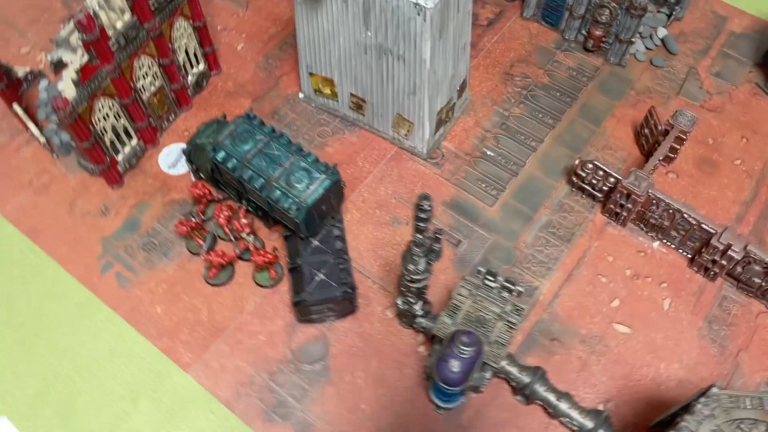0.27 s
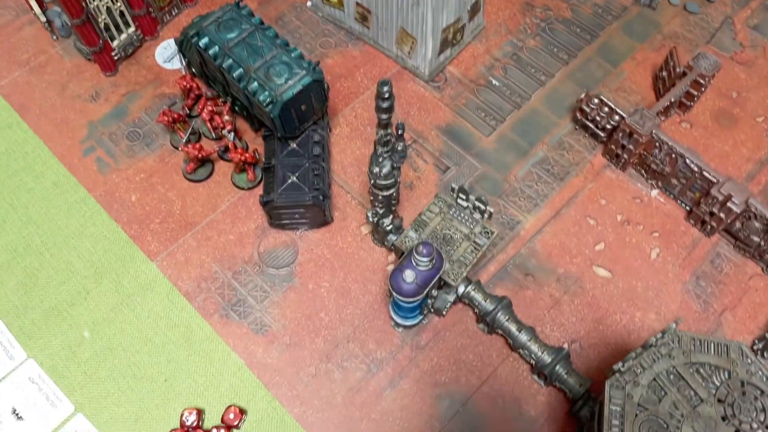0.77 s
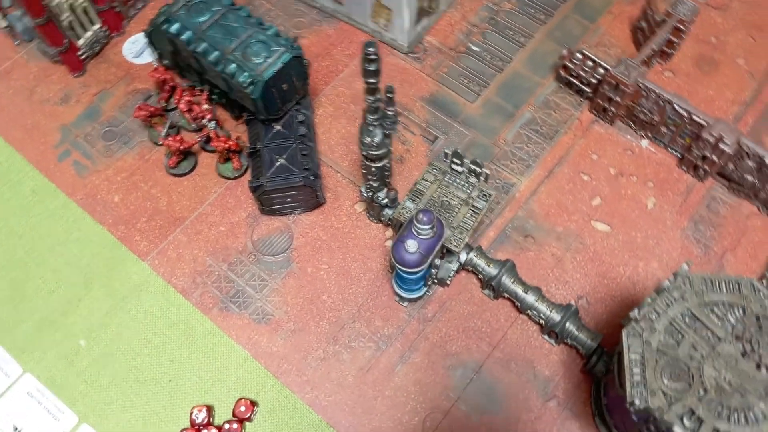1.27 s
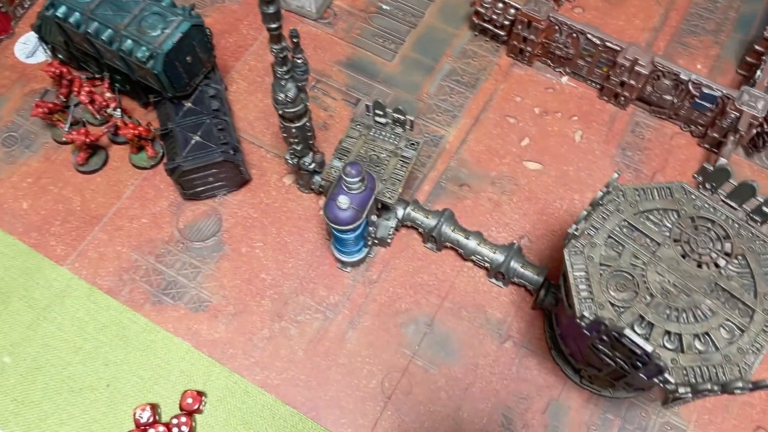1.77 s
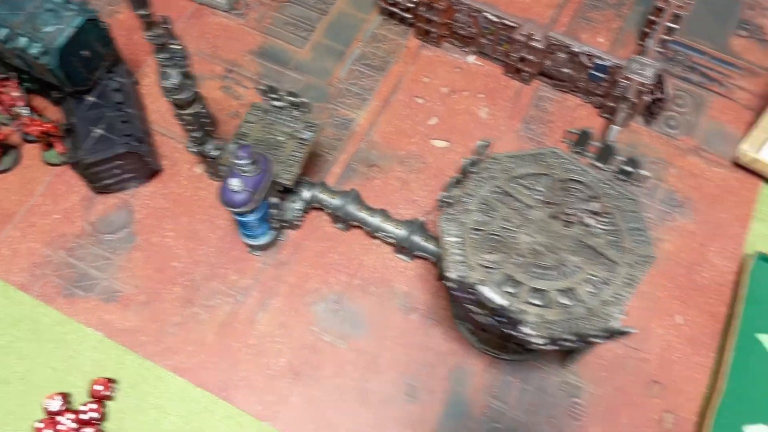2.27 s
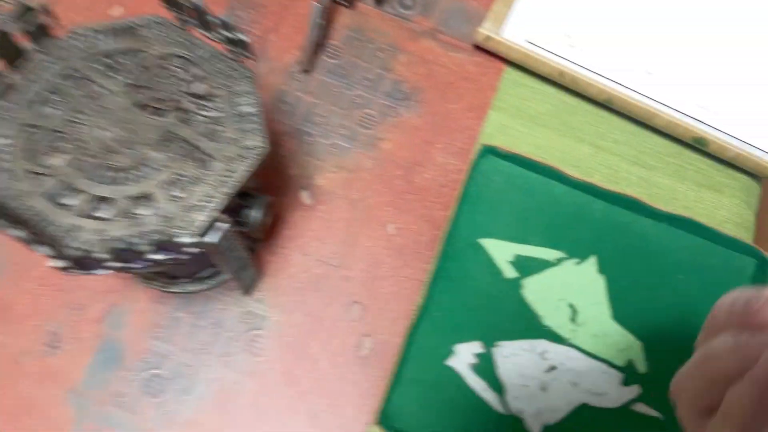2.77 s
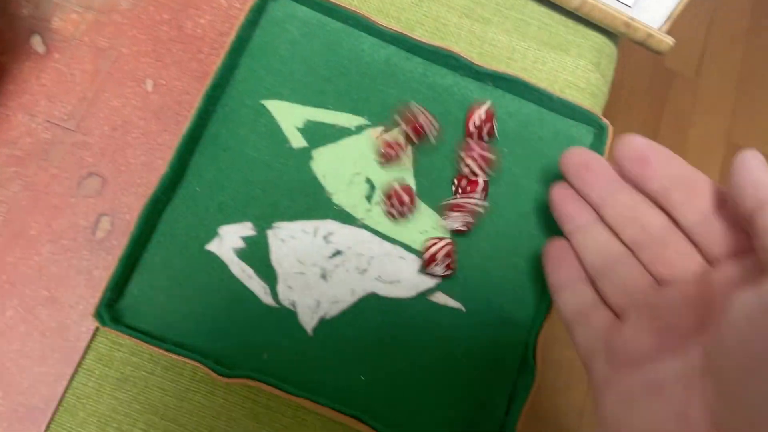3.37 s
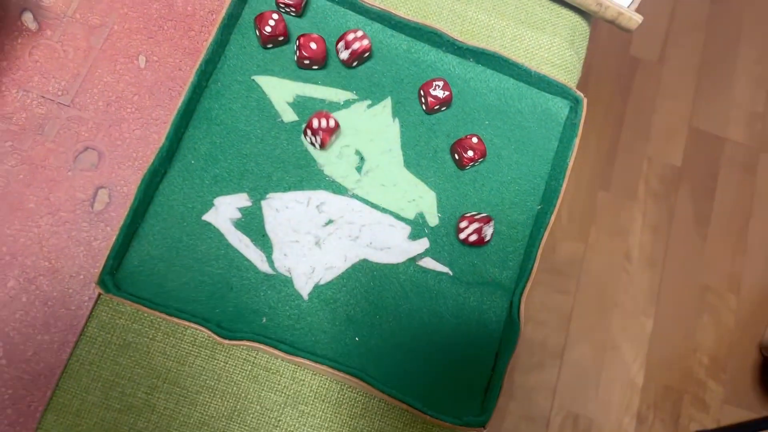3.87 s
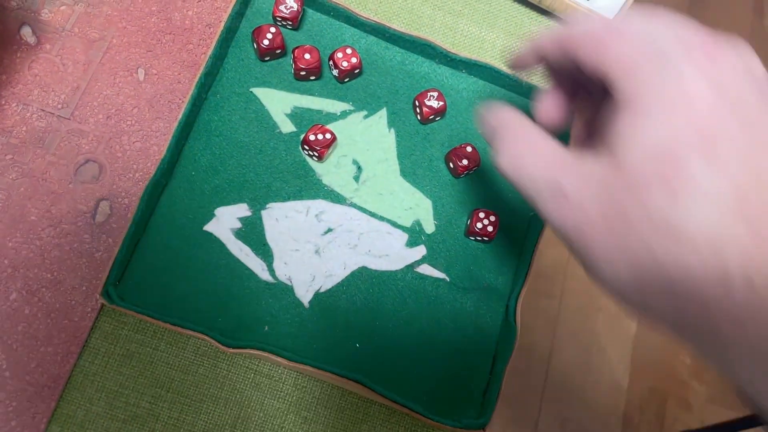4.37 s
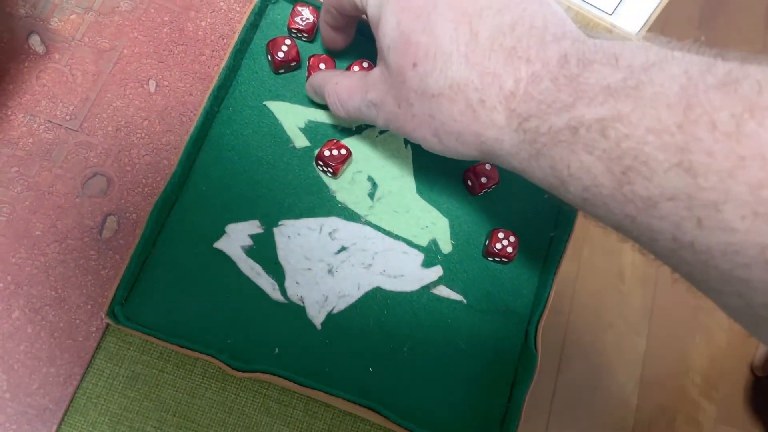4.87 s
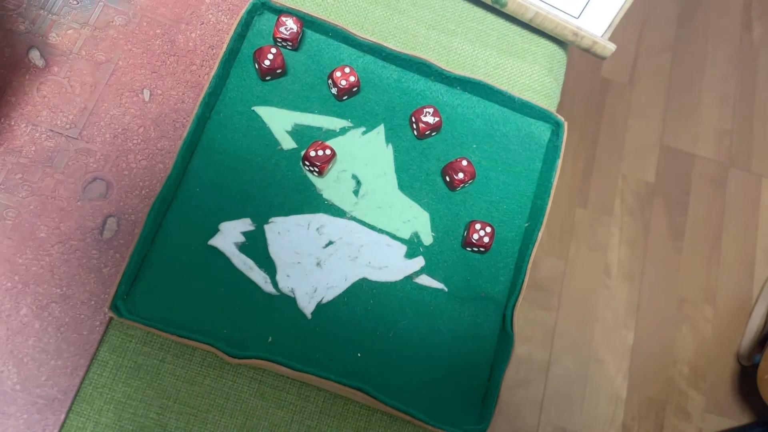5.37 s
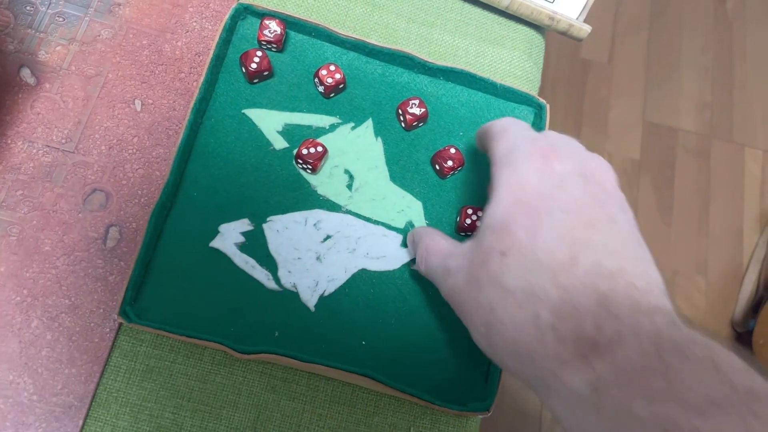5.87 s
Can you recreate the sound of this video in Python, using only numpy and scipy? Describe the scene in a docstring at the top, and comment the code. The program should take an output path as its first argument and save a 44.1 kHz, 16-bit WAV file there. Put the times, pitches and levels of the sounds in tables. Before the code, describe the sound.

A small, quiet room heard by two close microphones, with faint low room air throughout. From about 0.2 to 1.7 seconds a hand sweeps dice across a table: gritty, uneven scraping, a light tap at 0.3, a cluster of dull bumps from 0.5, the strongest near 0.7, and more around 1.2. Small bright ticks begin at 1.3 and gather near 1.65. From 2.1 to 2.85 the dice rattle in the palm in rapid, hard, crisp clicks. After a brief gap, clicks resume at 3.1 and the throw peaks at 3.2 to 3.4, with a very sharp crack at 3.34 and low, felt-muffled thuds ringing the tabletop; last ticks fall by 3.7. Then near quiet: a soft brush and dull hollow knock around 4.1, a loud tight run of hollow knocks with a short buzz at 4.6, a low bump at 5.4, faint brushing, and a final muted knock at 6.1.

```python
"""Dice are gathered from a gaming table, shaken in one hand and thrown into a felt-lined tray, in a small room.
Close to two microphones they click as short coloured ticks, and thud through the felt as ringing table modes.
The hand bumps the table as it sweeps them up (filtered noise and slips); skin and sleeve brush over cloth.
A few hollow knocks follow as dice are picked out: rough contacts shake a hollow body, which buzzes after
the loudest. Light taps and the air of the room, as shaped noise, complete the scene."""
import sys
import numpy as np
from scipy import signal
from scipy.fft import rfft, irfft
from scipy.io import wavfile
from scipy.ndimage import map_coordinates

SR = 44100
rng = np.random.default_rng(int(sys.argv[2]) if len(sys.argv) > 2 else 0)


def put_to_file(sound):
    """Save the sound as 16-bit audio at rate SR, in the file named by the first command-line argument."""
    columns = np.atleast_2d(sound).T  # one column per channel
    safe = np.clip(columns, -1, 1)
    whole_steps = np.round(safe * 32767)
    wavfile.write(sys.argv[1], SR, whole_steps.astype(np.int16))


N = 270156
TIME = np.arange(N) / SR

# spectrum of die on die: f/Hz, relative level/dB
DIE_SPECTRUM = [(900, -8), (1600, 4), (2900, -0.5), (4300, 2), (5500, 0), (7500, 1.5), (9500, -0.5),
                (10800, -6), (13200, -6.5), (15000, -34)]
# dice tumbling over each other, in the palm or falling:
# t/s, length/s, relative level of grinding/dB, relative level of loose clicks/dB
TUMBLES = [(2.15, 0.03, -52, -45.5), (2.213, 0.058, -31, -31.5), (2.287, 0.072, -47, -31),
           (2.42, 0.052, -78, -33.5), (2.551, 0.1, -63, -32), (3.183, 0.088, -70, -51),
           (3.342, 0.016, -26.5, -31)]
# hollow knocks: t/s, relative level/dB, hardness of the contact as upper band edge f/Hz, loss per rebound/dB
HOLLOW_KNOCKS = [(4.1222, -10.5, 2300, 6.5), (4.585, -2, 4200, 8), (4.601, -5, 4500, 6.5),
                 (4.634, -9, 4000, 10.5), (6.104, -10, 1900, 9)]
HOLLOW_T60_S = 0.048
OPPOSED_HZ = 8690  # where the two microphones move in opposite phase


def dice_clicks(level_db, near_db, near_s, tilt_db, size=1024):
    """Hard cubes meet in a fraction of a millisecond; palm and tray scatter each differently coloured tick."""
    # clicks that stand out: t/s, relative level/dB, brightness f/Hz
    clear_clicks = [(1.3086, -26.5, 6060), (1.333, -29.5, 4560), (1.4058, -31.5, 6660),
                    (1.506, -37.5, 6950), (1.543, -36, 4800), (1.638, -30.5, 7000), (1.6445, -22.5, 7900),
                    (1.6787, -17.5, 5670), (2.091, -45, 3650), (2.136, -44, 4360), (2.1989, -31.5, 4900),
                    (2.21, -26.5, 6350), (2.223, -17, 9390), (2.2261, -12, 8480), (2.25, -21.5, 5130),
                    (2.2575, -32, 5200), (2.2645, -21, 6200), (2.309, -33.5, 5340), (2.339, -23, 5400),
                    (2.4132, -25, 4900), (2.4298, -25.5, 5140), (2.458, -37, 4740), (2.483, -19, 6600),
                    (2.4881, -25, 4500), (2.503, -25, 6000), (2.5397, -26.5, 4933), (2.5489, -16, 5250),
                    (2.5626, -30, 5000), (2.569, -25, 5200), (2.5794, -21.5, 5200), (2.592, -40, 5560),
                    (2.607, -21, 5500), (2.6181, -25, 5800), (2.6199, -20, 5130), (2.642, -20, 5700),
                    (2.6537, -21, 4890), (2.6613, -28, 4680), (2.6899, -22, 6460), (2.7607, -39.5, 5020),
                    (2.7963, -27.5, 4350), (2.803, -21, 2800), (2.8304, -37.5, 6000), (2.8337, -23.5, 5870),
                    (3.095, -37.5, 5520), (3.1689, -33, 4357), (3.1773, -28, 4800), (3.183, -30.5, 4200),
                    (3.1877, -30.5, 4223), (3.1997, -23.5, 4715), (3.1993, -25.5, 4375),
                    (3.2045, -27, 5044), (3.206, -12.5, 5184), (3.2106, -17.5, 5810), (3.2143, -32, 6200),
                    (3.221, -21.5, 5890), (3.2255, -24.5, 4314), (3.2318, -19.5, 6570), (3.2444, -15, 4983),
                    (3.258, -28, 5240), (3.318, -22, 5340), (3.333, -17.5, 6000), (3.344, -20, 6280),
                    (3.3434, -0.5, 8350), (3.3663, -18, 6960), (3.3866, -18, 5046), (3.3942, -10.5, 8140),
                    (3.5314, -20, 6460), (3.5632, -29, 2180), (3.5965, -26, 5880), (3.6632, -26, 6320),
                    (3.678, -32, 5970), (3.685, -18, 7140)]
    ring_db, ring_octaves = 10.5, 0.63  # each contact rings around its own brightness
    out = np.zeros((2, N))
    hz = np.geomspace(900, 16000, 48)
    for s, db, bright_hz in clear_clicks + loose_clicks():
        tilt = tilt_db * np.log2(bright_hz / 5800) * np.log2(np.maximum(hz, 2500) / 5800)
        ripple_db = rng.normal(0, 2.2, len(hz))
        ringing = ring_db * np.exp(-(np.log2(hz / bright_hz) / ring_octaves) ** 2)
        spectrum = np.c_[hz, at_hz(DIE_SPECTRUM, hz) + tilt + ripple_db + ringing]
        tick = band(colour(spectrum, size=size), 600, 19000)
        tick = np.roll(tick, 8)  # a few samples of room ahead of the tick
        scattered = through(splash(near_s, size=size), tick)
        add(out, s, from_db(db + level_db) * unit(off_axis(tick) + from_db(near_db) * scattered))
    return out


def loose_clicks(count=16):
    """While the dice tumble they collide at a rough, uneven rate: rows of t/s, relative level/dB, f/Hz."""
    clicks_per_s, spread_db = 170, 1
    bright_hz, spread_octaves = 5240, 0.073
    rows = []
    for start, length, _, db in TUMBLES:
        lateness = rng.random(count)
        strengths, tones = rng.standard_normal((2, count))
        for k in range(count):
            after = (k + lateness[k]) / clicks_per_s
            if after < length:
                brightness = bright_hz * 2 ** (spread_octaves * tones[k])
                rows.append((start + after, db + spread_db * strengths[k], brightness))
    return rows


def dice_rattle():
    """Tumbling dice grind, as slips coloured like a die, and jostle edge on edge."""
    grind_db, jostle_db = -2, -10
    grinding = band(friction(DIE_SPECTRUM, grains_per_s=700, grain_share=.5), 2600, 13000, order=2)
    motion = strokes(TUMBLES, attack_s=0.0045, release_db_per_s=280.5)
    return motion * (from_db(grind_db) * grinding + from_db(jostle_db) * jostle())


def jostle(count=12):
    """Dice edges graze each other: small, uneven ticks, each ringing a few cycles at its pitch; rms one."""
    out = np.zeros(N)
    for hz in np.geomspace(3800, 9500, count):
        touches = (rng.random(N) < 45 / SR) * rng.choice([-1, 1], N)  # 45 a second
        touches = touches * from_db(rng.uniform(-14, 0, N))
        out += band(touches + 1e-18, hz / 1.2, hz * 1.2, order=2) / hz
    return np.sqrt(N) * unit(off_axis(out))


def tray_landings():
    """Dice thud through the felt into the table top and clack on the felt-damped floor of the tray."""
    # dice landing: t/s, relative level of thud/dB, relative level of clack/dB
    landings = [(3.308, -4, 0.5), (3.318, -3.5, -13), (3.329, -6, -8), (3.351, -28, -0.5),
                (3.358, -3, -14.5), (3.3845, -7.5, 6.5), (3.394, -13, 0.5), (3.422, -11.5, -24),
                (3.454, -35, -31), (3.483, -14.5, -4.5), (3.512, -14.5, -26), (3.563, -6.5, -1.5)]
    # modes of the tray floor: f/Hz, relative level/dB, t60/s
    tray_floor = [(890, -3, 0.0075), (1180, -6.5, 0.02), (1320, 5, 0.0099), (2200, 3, 0.0057)]
    return table_blows(landings, "tray", tray_floor, wave_db=5, thud_db=-29.0, clack_db=-23.5,
                       travel_s=0.0069, grit_db=-9.5, grit_s=0.0013, low_hz=600, soft_hz=1750,
                       thud_wet_db=-2.5, clack_wet_db=-6.5, order=4)


def table_bumps():
    """Hand and dice bump the middle of the table, whose skin clacks briefly."""
    # bumps: t/s, relative level of thud/dB, relative level of clack/dB
    bumps = [(0.509, -14, -7.5), (0.528, -20.5, -12), (0.549, -17.5, -8.5), (0.574, -11, -32),
             (0.715, 0, 1), (0.738, -3.5, -14), (0.868, -21.5, -40), (0.968, -23.5, -29.5),
             (1.175, -8.5, -21), (1.224, -11.5, -17.5), (1.59, -22, -38), (1.625, -25.5, -38),
             (1.69, -24.5, -34), (1.775, -23.5, -40.5), (5.400, -8.5, -32.5)]
    # modes of the table's skin: f/Hz, relative level/dB, t60/s
    table_skin = [(706, -18, 0.0045), (905, -15, 0.057), (1000, -29, 0.062), (1090, 17, 0.0053),
                  (1200, -17.5, 0.0066), (1640, -32, 0.055), (2260, 23, 0.0041)]
    return table_blows(bumps, "middle", table_skin, wave_db=2, thud_db=-31.0, clack_db=-30.5,
                       travel_s=0.00967, grit_db=11.5, grit_s=0.013, low_hz=670, soft_hz=1680,
                       thud_wet_db=-5, clack_wet_db=-1.0, order=3)


def table_blows(rows, place, skin, wave_db, thud_db, clack_db, travel_s, grit_db, grit_s,
                low_hz, soft_hz, thud_wet_db, clack_wet_db, order):
    """A wave crosses the table top, whose modes boom by place struck; cloth cuts the clack above soft_hz."""
    # table top: f/Hz, relative level struck through the tray/dB, relative level bumped in the middle/dB
    table_modes = [(61.6, 5, 6), (79, 0, -14), (116.3, -12, 4), (141, 7.5, 8), (168, 7, -2),
                   (189, 2.5, -3.5), (225.4, -3.5, -8), (270.8, -6.5, 0), (319.6, -2, -14), (346.3, -9, -2),
                   (429, -15, -8), (522, -24.5, -16), (600.7, -19, -21)]
    t60_s = 0.17
    modes = [(hz, tray_db if place == "tray" else middle_db, t60_s) for hz, tray_db, middle_db in table_modes]
    thuds, clacks = np.zeros((2, 2, N))
    for s, thud, clack in rows:
        add(thuds, s, from_db(thud + wave_db) * bending_wave(travel_s))
        # the modes start later than the first wave
        boom = from_db(thud_db) * ring(modes, scatter_db=3.0, travel_s=travel_s * 2)
        add(thuds, s, from_db(thud) * band(boom, 48, 800, order=3))
        knock = from_db(clack_db) * ring(skin, scatter_db=2.0, travel_s=0, size=4096)
        knock = knock + from_db(grit_db) * splash(grit_s, size=4096)
        add(clacks, s, from_db(clack) * band(knock, low_hz, soft_hz, order=order))
    return room(thuds, thud_wet_db, build_s=.002) + room(clacks, clack_wet_db, build_s=.004)


def bending_wave(travel_s, size=4096):
    """High pitches outrun low ones through the table top, so the thud sweeps down (travel_s at 100 Hz)."""
    # spectrum of the first wave: f/Hz, relative level/dB
    wave_spectrum = [(25, -40), (60, -3), (130, 4), (330, -1), (650, -12.5), (1000, -27.5), (1500, -37.5),
                     (4000, -47.5)]
    hz = np.fft.rfftfreq(size, 1 / SR)
    lag = np.exp(-2j * np.pi * travel_s * 20 * np.sqrt(hz))
    return irfft(rfft(colour(wave_spectrum, size=size)) * lag)


def knocks(ring_db, crack_db, crack_s, count=4):
    """A rough contact cracks and shakes a hollow body, dulled by its softness; rebounds grow weaker."""
    # spectrum of the crack: f/Hz, relative level/dB
    crack_spectrum = [(30, -16), (55, 17), (90, 19), (150, 6.5), (240, 12), (400, 18), (800, 3.5),
                      (2200, 10), (2700, 19), (3700, 0), (5500, -13), (8000, -3), (13000, -2),
                      (15000, -9.5)]
    rebound_s = 0.019
    out = np.zeros((2, N))
    for s, db, hard_hz, loss_db in HOLLOW_KNOCKS:
        for k in range(count):
            contact = off_axis(splash(crack_s, size=8192)[0])
            body = ring(hollow_modes(HOLLOW_T60_S), scatter_db=3.0, travel_s=0.00093, size=4096)
            response = from_db(ring_db) * body + from_db(crack_db) * colour(crack_spectrum)
            knock = band(through(contact, response), 62, hard_hz, order=2)
            add(out, s + k * rebound_s, from_db(db - k * loss_db) * knock)
    return out


def hollow_modes(t60):
    """The hollow body is gripped differently at each contact, which shifts every mode a little."""
    # modes before the shift: f/Hz, relative level/dB
    hollow_body = [(76, -3), (160, -2), (350, -5), (425, -24.5), (485, -4.5), (600, -2.5), (955, -3),
                   (1127, -3.5), (1330, -20.5), (1740, -1.5), (2070, 1), (2200, -11.5), (3120, -9),
                   (3620, -0.5), (5310, -6), (5750, -16.5)]
    detune_octaves = 0.032
    return [(hz * 2 ** (detune_octaves * rng.uniform(-1, 1)), db, t60) for hz, db in hollow_body]


def shiver(ring_db, count=5):
    """After the loudest knock the hollow body buzzes on in its upper modes, which shift as it settles."""
    # spectrum of the buzz: f/Hz, relative level/dB
    buzz_spectrum = [(200, -3.5), (500, 8), (1200, 3.5), (2200, 4), (2800, -5), (3700, -1), (4600, -5.5),
                     (5600, -1), (6400, -6.5), (7800, 2), (9000, -6), (13500, -5), (15500, -26.5)]
    level_db, length_s = -34.5, 0.087
    start = max(HOLLOW_KNOCKS, key=lambda row: row[1])[0]
    buzz = friction(buzz_spectrum, grains_per_s=410, grain_share=0.25)
    ringing = 0
    for share in np.eye(count):  # crossfade from one set of modes to the next
        modes = [mode for mode in hollow_modes(HOLLOW_T60_S / 2) if mode[0] > 2100]
        turn = np.interp(TIME, start + np.linspace(0, length_s, count), share)
        body = unit(ring(modes, scatter_db=6.0, travel_s=0, size=2048))
        ringing = ringing + np.sqrt(turn) * through(buzz, body)
    motion = strokes([(start, length_s, level_db)], attack_s=0.018, release_db_per_s=270)
    return motion * (buzz + from_db(ring_db) * ringing)


def taps(level_db):
    """Small pieces touch down lightly: short bursts of noise in one band."""
    # taps: t/s, relative level/dB, f/Hz, band edge over centre as a ratio (1.1 at least is applied)
    light_taps = [(0.2932, -22, 1670, 1.56), (1.926, -101, 1910, 0.81), (3.857, -38, 2140, 1.28),
                  (5.071, -51.5, 1424, 1.38), (5.653, -60.5, 1094, 1.73), (5.797, -51, 1000, 1.3),
                  (5.825, -48.5, 995, 1.3)]
    out = np.zeros((2, N))
    for s, db, hz, width in light_taps:
        ratio = max(width, 1.1)
        tap = unit(band(splash(.0012, size=1024), hz / ratio, hz * ratio, order=3))
        add(out, s, from_db(db + level_db) * tap)
    return out


def sweeps():
    """Dice are swept over the mat: sliding friction that catches and frees itself."""
    # sweeps: t/s, length/s, relative level/dB
    sweep_moves = [(-.04, 0.035, -47.5), (.16, 0.24, -63.5), (.29, 0.19, -46.5), (.5, 0.23, -42.5),
                   (.7, 0.11, -45.5), (.85, 0.04, -44.5), (1.21, 0.14, -38.5), (1.38, 0.32, -44),
                   (1.665, 0.012, -37.5)]
    # spectrum of dice on the mat: f/Hz, relative level/dB
    slide_spectrum = [(200, 0.5), (600, -8), (1500, 3.5), (2300, -5), (3300, -5), (5500, -8.5),
                      (8000, -11.5), (10500, -12), (13000, -12), (15000, -33)]
    level_db = -4.5
    motion = strokes(sweep_moves, attack_s=0.018, release_db_per_s=143.5)
    rub = motion * friction(slide_spectrum, grains_per_s=180, grain_share=0.048)
    return from_db(level_db) * rub * uneven(depth_db=3, rate=45)


def uneven(depth_db, rate):
    """Gain of a sliding contact that catches and frees itself, drawn anew rate times a second."""
    knots = rng.standard_normal(1024)
    return from_db(depth_db * np.interp(TIME * rate, np.arange(len(knots)), knots))


def brushes():
    """Skin and sleeve brush softly over cloth."""
    # brushes: t/s, length/s, relative level/dB
    brush_moves = [(1.87, 0.074, -52), (4.065, 0.069, -35.5), (4.38, 0.045, -54), (5.36, 0.084, -51),
                   (5.89, 0.064, -47.5), (6.03, 0.09, -46.5)]
    # spectrum of brushed cloth: f/Hz, relative level/dB
    cloth_spectrum = [(200, -10.5), (600, -12), (1300, 0), (2200, -3), (3500, -13), (6000, -21.5),
                      (13000, -15.5), (15000, -35)]
    level_db = -10
    motion = strokes(brush_moves, attack_s=0.05, release_db_per_s=218.5)
    return from_db(level_db) * motion * friction(cloth_spectrum, grains_per_s=760, grain_share=0.24)


def friction(spectrum, grains_per_s, grain_share):
    """Countless tiny slips with a few stronger catches; rms about one."""
    catches = (rng.random(N) < grains_per_s / SR) * rng.standard_normal(N) * np.sqrt(SR / grains_per_s)
    slips = rng.standard_normal((2, N))
    contact = np.sqrt(1 - grain_share) * slips + np.sqrt(grain_share) * off_axis(catches)
    return through(contact, colour(spectrum))


def strokes(rows, attack_s, release_db_per_s):
    """Gain of movements (t/s, length/s, level/dB): each swells, holds and then fades at a steady rate."""
    gain = 0
    for start, length, db, *_ in rows:
        swell = np.clip((TIME - start) / attack_s, 0, 1) ** 2
        fade_db = release_db_per_s * np.maximum(TIME - start - length, 0)
        gain = gain + swell * from_db(db - fade_db)
    return gain


def room_air():
    """Steady air of the room: coloured noise spread by the room's own tail."""
    # spectrum of the air: f/Hz, relative level/dB
    air_spectrum = [(20, -22.5), (40, -2.5), (65, 4), (130, -6), (300, -12), (600, -19), (1300, -19.5),
                    (3000, -33), (7000, -32), (13000, -27), (14500, -53.5)]
    level_db = -69  # gain on the noise after the room
    air = through(rng.standard_normal(N), colour(air_spectrum))
    return room(air, wet_db=4, build_s=.005) * from_db(level_db)


def room(x, wet_db, build_s, size=26460):
    """Add a diffuse tail, most alike at the two microphones in the bass, dying band by band."""
    # decay of the room: f/Hz, t60/s
    room_decay = [(100, .36), (300, .38), (800, .38), (1800, .42), (5000, .40), (9000, .33), (14000, .28)]
    treble_alike = 0.32  # least share that both microphones hear alike
    hz, t = np.fft.rfftfreq(size, 1 / SR), TIME[:size]
    own = rfft(rng.standard_normal((2, size)))
    shared = rfft(rng.standard_normal(size))
    alike = np.maximum(1 / (1 + (hz / 380) ** 2), treble_alike)
    noise = own * np.sqrt(1 - alike) + shared * np.sqrt(alike)
    centres, t60s = np.transpose(room_decay)
    tail = 0
    for share, t60 in zip(np.eye(len(t60s)), t60s):
        part = irfft(noise * np.interp(hz, centres, share), size)
        tail = tail + part * np.exp(-np.log(1000) * t / t60)
    tail = unit(tail * (1 - np.exp(-t / build_s)))
    return x + from_db(wet_db) * through(x, tail)


def off_axis(x):
    """Treble arrives latest at the left microphone; its phase lags half a turn at OPPOSED_HZ."""
    hz = np.fft.rfftfreq(len(x), 1 / SR)
    left = irfft(rfft(x) * np.exp(-1j * np.pi * (hz / OPPOSED_HZ) ** 1.55), len(x))
    return np.array([left, x])


def placed(x):
    """Balance and arrival time drift between the two microphones as the hand works along the table."""
    # where the hand works: t/s, left minus right level/dB, lateness at the left microphone/s
    hand_path = [(0, 3.5, 0), (.5, -0.5, .00018), (1.2, -1, .00018), (1.7, 1.5, .00005), (2.5, -1, .00012),
                 (3.2, 2, 0), (3.45, 2.5, 0), (4, 1, -.0002)]
    s, balance_db, lateness_s = np.transpose(hand_path)
    pan_db = np.interp(TIME, s, balance_db)
    late_s = np.interp(TIME, s, lateness_s)
    left = map_coordinates(x[0], [(TIME - late_s) * SR], order=3, mode="nearest")
    return np.array([left, x[1]]) * from_db([pan_db / 2, -pan_db / 2])


def ring(modes, scatter_db, travel_s, size=22050):
    """One blow on a body; bending waves are slower at low pitch (travel_s at 100 Hz): low modes start late."""
    hz, db, t60 = np.transpose(modes)[:, :, None]
    t = np.maximum(TIME[:size] - travel_s * 10 / np.sqrt(hz), 0)
    sign = rng.choice([-1, 1], hz.shape)
    strength = sign * from_db(db + scatter_db * rng.standard_normal(hz.shape))
    decay = np.exp(-np.log(1000) * t / t60)
    return np.sum(strength * np.sin(2 * np.pi * hz * t) * decay, axis=0)


def splash(decay_s, size):
    """Stereo noise that dies away: a cloud of close reflections."""
    return unit(rng.standard_normal((2, size)) * np.exp(-TIME[:size] / decay_s))


def colour(spectrum, size=4096):
    """Causal (minimum-phase) response with the given spectrum, energy one."""
    level = from_db(at_hz(spectrum, np.fft.rfftfreq(size, 1 / SR)))
    cepstrum = irfft(np.log(level))
    cepstrum[1:size // 2] *= 2
    cepstrum[size // 2 + 1:] = 0
    return unit(irfft(np.exp(rfft(cepstrum))))


def band(x, low_hz, high_hz, order=1):
    """Butterworth band-pass."""
    edges = [low_hz, min(high_hz, .45 * SR)]
    return signal.sosfilt(signal.butter(order, edges, "band", fs=SR, output="sos"), x)


def through(x, response):
    """Convolve into stereo."""
    wet = signal.fftconvolve(np.atleast_2d(x), np.atleast_2d(response), axes=-1)
    return wet[:, :x.shape[-1]] * np.ones((2, 1))


def add(out, s, sound):
    """Mix a sound in at time s."""
    i = int(round(s * SR))
    out[..., i:i + sound.shape[-1]] += sound[..., :max(N - i, 0)]


def at_hz(points, hz):
    """Read a spectrum on a log-frequency axis."""
    f, value = np.transpose(points)
    return np.interp(np.log(np.maximum(hz, 1)), np.log(f), value)


def unit(x):
    """Scale to an energy of one per channel."""
    return x / np.sqrt(np.sum(x ** 2, axis=-1, keepdims=True) + 1e-20)


def from_db(db):
    """Amplitude ratio of a level in dB."""
    return 10 ** (np.asarray(db) / 20)


def scene():
    """Blows ring out into the room over friction and room air; all shifts between the microphones."""
    clicks = dice_clicks(level_db=17.0, near_db=1.0, near_s=0.0028, tilt_db=8.0)
    clicks = room(clicks, wet_db=-9.0, build_s=0.0017)
    hollow = room(knocks(ring_db=-22.5, crack_db=2.0, crack_s=0.0053), wet_db=-16, build_s=0.0011)
    light = room(taps(level_db=13.5), wet_db=-7, build_s=0.0012)
    blows = clicks + tray_landings() + table_bumps() + hollow + light
    rubbing = dice_rattle() + shiver(ring_db=-3.5) + sweeps() + brushes()
    return placed(blows + rubbing + room_air())


def record(dry):
    """In one treble band the microphones move against each other; peaks clip at full scale; the top is cut."""
    opposed_share, width_hz, cutoff_hz = 0.82, 3500, 15600
    mid, side = (dry[0] + dry[1]) / 2, (dry[0] - dry[1]) / 2
    opposed = opposed_share * band(mid, OPPOSED_HZ - width_hz / 2, OPPOSED_HZ + width_hz / 2)
    mid, side = mid - opposed, side + opposed
    clipped = np.clip([mid + side, mid - side], -1, 1)
    return signal.sosfilt(signal.butter(14, cutoff_hz, fs=SR, output="sos"), clipped)


dry = scene()
out = record(dry)
put_to_file(out)
```